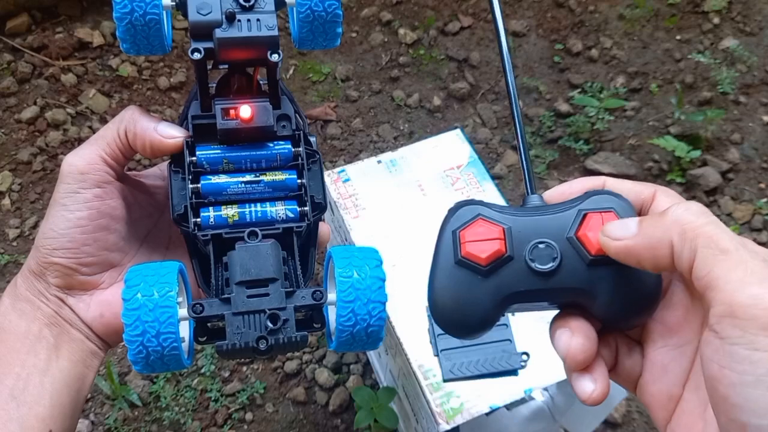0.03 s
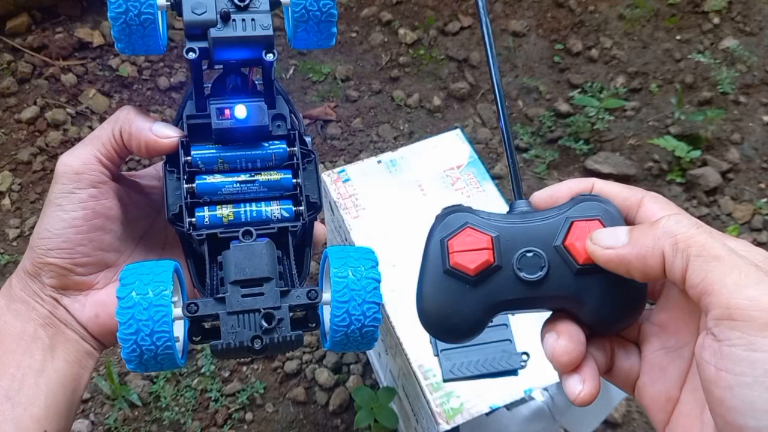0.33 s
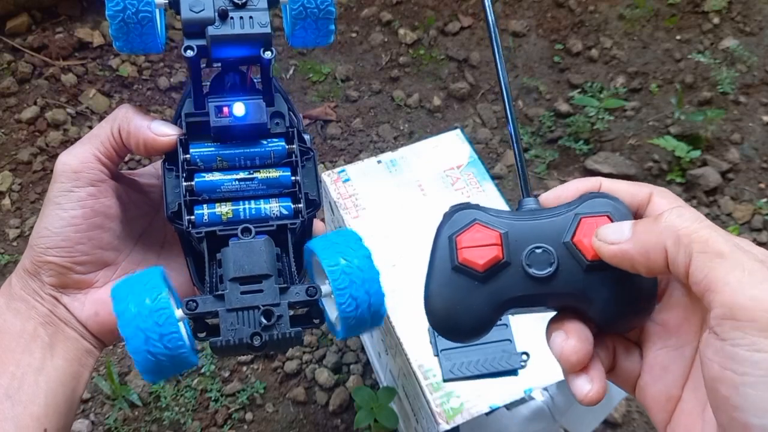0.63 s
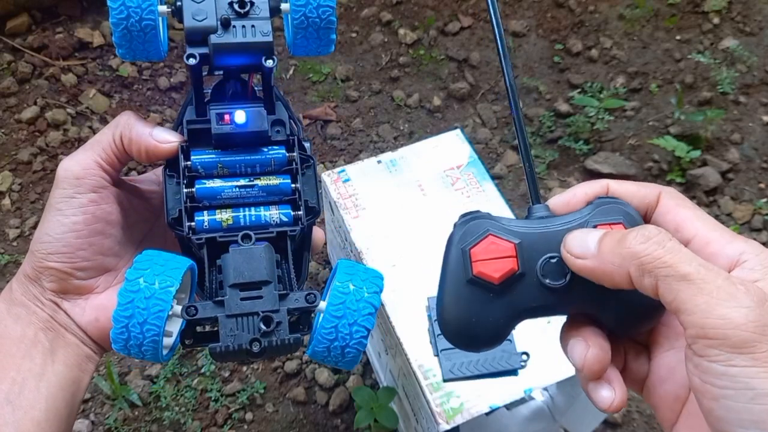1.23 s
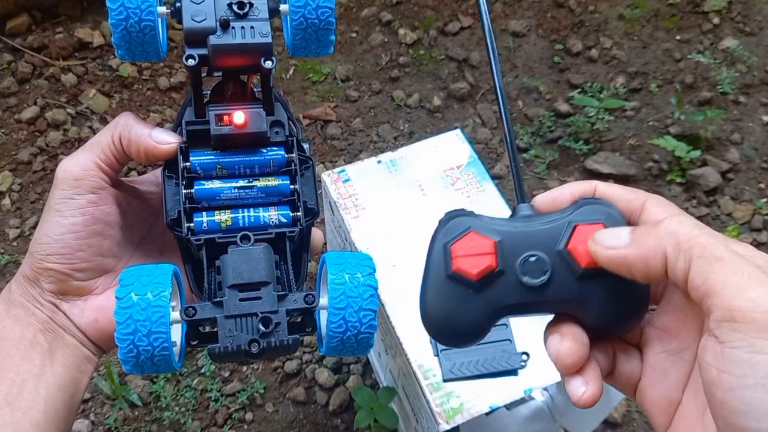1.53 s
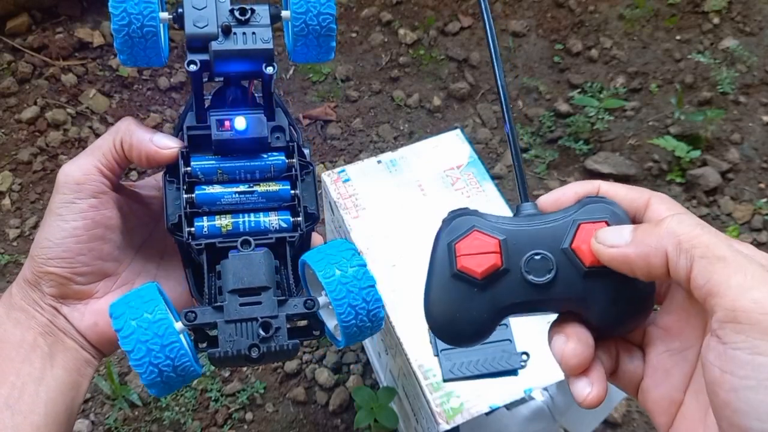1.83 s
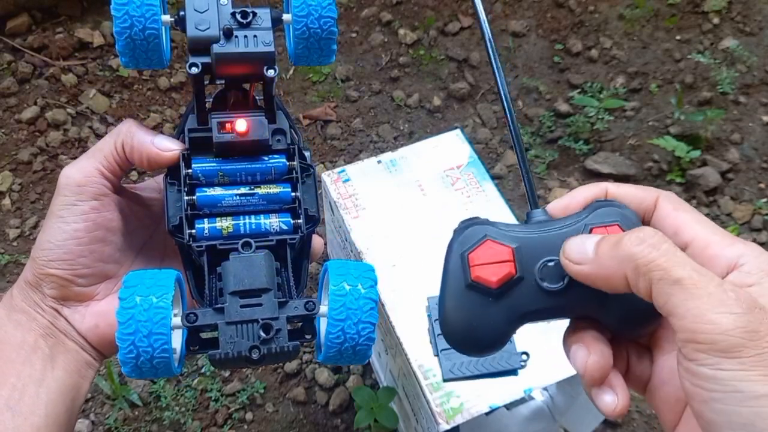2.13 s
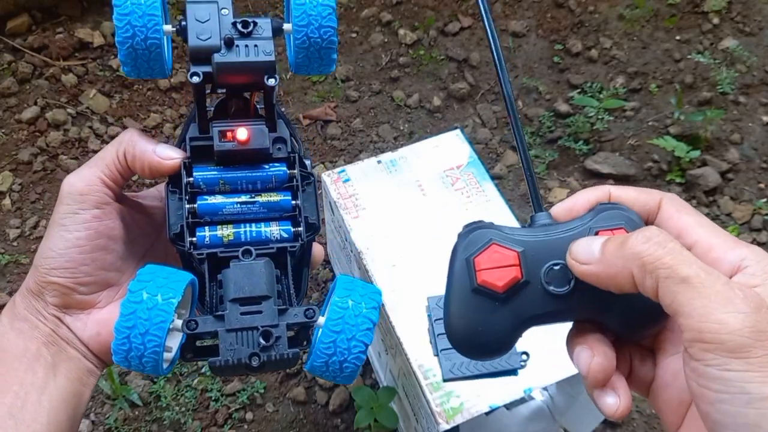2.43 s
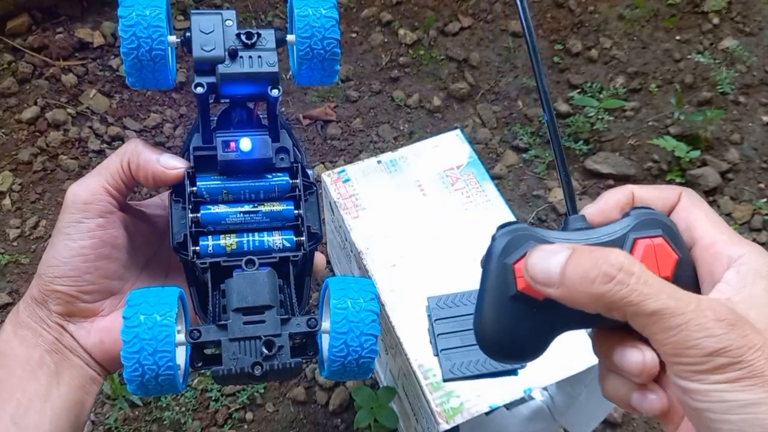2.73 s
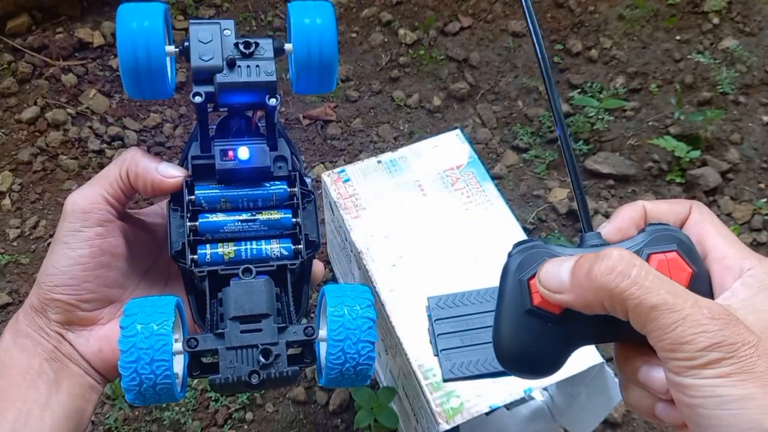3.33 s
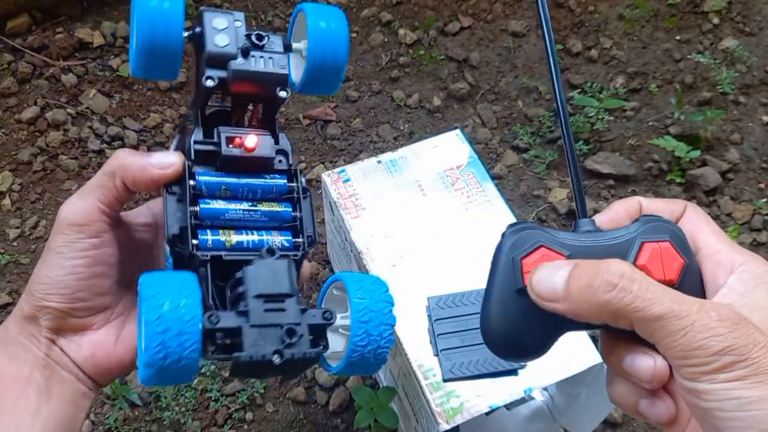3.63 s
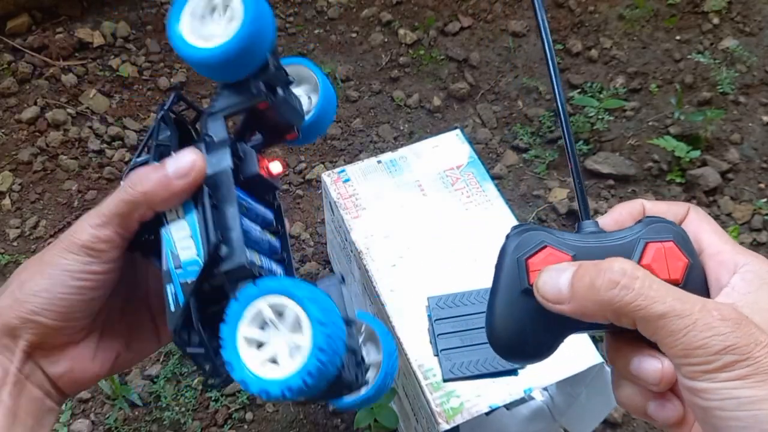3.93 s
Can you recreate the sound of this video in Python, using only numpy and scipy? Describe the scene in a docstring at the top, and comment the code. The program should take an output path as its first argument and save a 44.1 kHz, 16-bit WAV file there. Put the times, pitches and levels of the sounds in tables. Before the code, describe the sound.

A toy car's whirring motor is the main sound, heard close outdoors. First, from about 0.2 seconds, plastic remote buttons click repeatedly while the steering answers with small ticks and scrapes. A soft hollow bump comes at 2.7 seconds. From 2.9 the motor spins up with clattering gears, peaks near 3.4 and slows toward 4. A low engine-like drone and faint insect trill sit behind.

```python
"""A toy car is held upside down outdoors, close by. A soft low rush opens; then buttons snap in the
remote's plastic shell and the steering answers with linkage ticks and rack scrapes.
At 2.7 s the grip shifts and bumps the hollow remote. From 2.9 s the motor spins the free wheels:
gear teeth ring the gearbox and clatter in their play, brushes hiss, the chassis hums; then it runs down.
Throughout: a low drone like a distant engine, a thin insect trill, a short echo off nearby walls."""
import sys
import numpy as np
from scipy import signal
from scipy.fft import rfft, irfft, next_fast_len
from scipy.io import wavfile
from scipy.ndimage import map_coordinates

SR = 44100
rng = np.random.default_rng(int(sys.argv[2]) if len(sys.argv) > 2 else 0)


def generate_wav(sig):
    """Save sig (samples, or channels by samples) to the path in sys.argv[1] as 16-bit PCM at SR."""
    pcm = np.round(np.clip(np.atleast_2d(sig).T, -1, 1) * 32767).astype(np.int16)
    wavfile.write(sys.argv[1], SR, pcm)


N = 176400

# Drive effort (time [s], gear level [dB], brush level [dB])
DRIVE_EFFORT = [(2.87, -84, -88), (2.885, -64, -70), (2.955, -54.5, -63), (2.985, -43.5, -78),
                (3.05, -39.5, -59), (3.17, -42, -56), (3.3, -38, -53.5), (3.48, -41.5, -53.5),
                (3.6, -44, -55.5), (3.7, -52, -58), (3.82, -53.5, -61.5), (3.92, -50, -72), (4.0, -58, -67)]
# Motor speed (time [s], share of full speed [1])
MOTOR_SPEED = [(2.87, 0.013), (2.96, 0.33), (3.05, 0.74), (3.2, 0.92), (3.45, 0.99), (3.7, 0.79),
               (4.0, 0.49)]
# Gears jumping in their play (time [s], strength [dB])
GEAR_JUMPS = [(3.052, 2), (3.081, 6.5), (3.113, 7), (3.131, 7), (3.173, 10), (3.193, 8.5), (3.229, 4.5),
              (3.29, 6.5), (3.335, -1), (3.431, 8.5), (3.473, 13), (3.486, 6.5), (3.518, 5.5),
              (3.576, 10.5), (3.617, 10), (3.634, 6), (3.659, 10.5), (3.679, 12.5), (3.705, 14),
              (3.756, 17), (3.788, 16.5), (3.814, 12.5), (3.842, 10.5), (3.914, 3)]
# Brush hiss (frequency [Hz], gain [dB])
BRUSH_SPECTRUM = [(3000, -16), (7000, -6), (8700, -5.5), (9700, -5), (10800, -5.5), (12050, 0.5),
                  (13100, -16), (15000, -1.5), (16000, -26)]
# Brush ring at high speed (frequency [Hz], gain [dB])
BRUSH_RING_SPECTRUM = [(9000, -40), (11300, -12), (12050, 0), (12600, -14), (14500, -35)]
# Drive balance (frequency [Hz], left over right [dB])
DRIVE_PAN = [(200, -2.5), (700, 4), (1700, 4), (2700, 0.5), (3700, 4), (5700, 1.5), (7500, 1), (9300, 7),
             (15000, 5)]

def drive():
    """The motor turns the gears while its brushes hiss; each gear jump swells both."""
    t = np.arange(N) / SR
    gears_db, brush_db = curves(DRIVE_EFFORT)
    speed, = curves(MOTOR_SPEED)
    jumps_db = sum(db * bell(t, s, sigma_s=0.0038) for s, db in GEAR_JUMPS)
    gears = gearbox(speed)
    clatter_db = 0.79 * jumps_db + 4.2 * np.tanh(wobble(130))
    gears *= amp(gears_db - 0.5 + clatter_db)
    hiss = amp(brush_db - 1.5 + 0.34 * clatter_db) * noise(BRUSH_SPECTRUM, side_db=-1.5)
    brush_ring = amp(-56) * speed ** 5.5 * noise(BRUSH_RING_SPECTRUM, side_db=-4)
    return filtered(gears + hiss + brush_ring, lambda hz: pan(along(DRIVE_PAN, hz)))

# Gearbox response (frequency [Hz], gain [dB])
GEARBOX_RESPONSE = [(100, -20), (200, -5.5), (330, -7.5), (620, -20), (850, -8.5), (1150, -2), (1400, -1),
                    (1650, 2.5), (1880, -1), (2080, 7.5), (2400, 0), (2800, -3.5), (3100, -0.5), (3600, -2),
                    (4700, -5), (5500, 0), (5950, -1.5), (6350, -14.5), (7700, -14), (8500, -18.5),
                    (16000, -25)]
# Housing resonances (frequency [Hz], bandwidth [Hz], gain [dB])
HOUSING_MODES = [(1692, 60, 4.5), (2090, 28.2, -11), (3050, 125, 0.5), (3790, 49, -7), (5570, 180, -9),
                 (5800, 130, -12)]
# Gearbox stereo width (frequency [Hz], side over mid [dB])
GEARBOX_WIDTH = [(100, -26), (380, -10), (700, 0), (1300, -2), (2400, 4.5), (4400, -1.5), (15000, 3)]

def gearbox(speed, full_speed_tooth_hz=2098, scatter_db=4):
    """Gear teeth strike unevenly and ring the gearbox and its housing."""
    def housing(hz):
        return sum(amp(db) * 1j * hz * width / (centre ** 2 - hz ** 2 + 1j * hz * width)
                   for centre, width, db in HOUSING_MODES)

    def mid_side_gains(hz):
        angle = np.arctan(amp(along(GEARBOX_WIDTH, hz)))
        return np.array([np.cos(angle), np.sin(angle)])

    teeth_passed = np.cumsum(full_speed_tooth_hz * speed * (1 + 0.012 * wobble(60))) / SR
    strikes = np.diff(np.floor(teeth_passed), prepend=0) * np.sqrt(SR / full_speed_tooth_hz)
    polarity = rng.choice([-1, 1], (2, N))
    strength = amp(scatter_db * np.clip(rng.standard_normal((2, N)), -2, 1))
    mesh_tone = amp(-14.5) * strikes
    tooth_noise = amp(0.5) * rng.standard_normal((2, N))
    force = strikes * polarity * strength + mesh_tone + tooth_noise
    body = unit(coloured(force, lambda hz: along(GEARBOX_RESPONSE, hz)))
    body += amp(-8.5) * unit(filtered(force, housing))
    mid, side = filtered(wandering_contact(body, depth_db=3), mid_side_gains)
    stereo = np.array([mid + side, mid - side])
    return stereo / np.std(stereo[:, speed > 0.5])

def wandering_contact(x, depth_db):
    """The contact point wanders: each moment rings other parts of the housing with the same energy."""
    frames = signal.stft(x, nperseg=512)[2]
    patch = np.outer(np.hanning(7), np.hanning(10))
    field = signal.fftconvolve(rng.standard_normal(frames.shape[1:]), patch, mode="same")
    frames *= amp(depth_db * np.clip(unit(field), -2, 2))
    frames /= np.linalg.norm(frames, axis=(0, 1))
    return signal.istft(frames, nperseg=512)[1][:, :N]

def clatter_rings(low_hz=1500, high_hz=6000, t60_s=0.024, lead_s=0.0019):
    """Each gear jump rings eight housing modes, different every time."""
    out, t = np.zeros((2, N)), np.arange(SR // 10) / SR
    gears_db, _ = curves(DRIVE_EFFORT)
    envelope = amp(-60 * t / t60_s) * attack(t, 0.0007)
    for s, db in GEAR_JUMPS:
        hz = low_hz * (high_hz / low_hz) ** rng.random((8, 1))
        ring = unit(rng.standard_normal((2, len(hz))) @ np.sin(2 * np.pi * hz * t))
        level_db = gears_db[round(s * SR)] + db - 2
        add(out, s - lead_s, pan(2.7) * amp(level_db) * envelope * ring)
    return out

# Chassis vibration (frequency [Hz], gain [dB])
HUM_SPECTRUM = [(90, -11), (150, 5), (200, -2.5), (320, -1.5), (480, -8), (650, -20), (1200, -40)]
# Hum envelope (time [s], level [dB])
HUM_ENVELOPE = [(2.87, -88), (2.92, -57), (3.2, -51), (3.42, -51), (3.6, -69.5), (3.8, -73), (4, -78)]

def chassis_hum():
    """The loaded motor shakes the chassis."""
    level_db, = curves(HUM_ENVELOPE)
    return pan(3.9) * amp(level_db) * noise(HUM_SPECTRUM, side_db=-15)

# Button and tick band centres (frequency [Hz])
CLICK_BANDS_HZ = [1400, 2800, 5600, 11300]
# Presses and releases (time [s], left over right [dB], 4 x band gain [dB])
BUTTON_SNAPS = [(0.2433, 1.4, -37, -36, -38.5, -35), (.596, 2.1, -51.5, -49, -59.5, -60),
                (.868, .5, -38, -32.5, -45, -40.5), (1.2805, 1.3, -38, -40.5, -59.5, -62),
                (1.545, 3.1, -41.5, -33.5, -41.5, -34.5), (1.8477, 2.2, -40.5, -43, -51, -55.5),
                (2.1081, .5, -38, -32, -40.5, -41), (2.511, 2.03, -45, -53, -56, -59.5),
                (2.871, 3.3, -43, -43, -45.5, -45.5)]
# Remote shell response (frequency [Hz], gain [dB])
SHELL_RESPONSE = [(200, -15), (700, -22.5), (1000, -14), (1250, -0.5), (1420, -4.5), (1620, 11.5),
                  (1900, 3), (2500, 0), (3300, -2), (4300, -8), (5300, -2.5), (6300, -2.5), (7500, -4.5),
                  (9400, -3.5), (11500, -11.5), (13000, -15), (16000, -15)]
# Shell after-ring (frequency [Hz], gain [dB])
SHELL_RING = [(500, -24), (1350, -12.5), (1580, 7), (1850, -14), (2300, -6.5), (3050, -1), (3500, -4),
              (4100, -7), (12000, -31)]

def buttons():
    """Each snap cracks through the remote's shell, which rings on faintly."""
    out = np.zeros((2, N))
    for s, pan_db, *band_db in BUTTON_SNAPS:
        bands = list(zip(CLICK_BANDS_HZ, band_db))
        tail = burst(t60_s=0.14, rise_s=0.036, side_db=-0.5)
        ring = amp(-3) * coloured(tail, lambda hz: along(SHELL_RING, hz))
        crack = amp(-7.5) * burst(t60_s=0.0027, rise_s=0.0001, side_db=-10)
        body = burst(t60_s=0.023, rise_s=0.0001, side_db=-2.5)
        snap = coloured(crack + body, lambda hz: along(SHELL_RESPONSE, hz))
        add(out, s, pan(pan_db) * amp(33) * coloured(snap + ring, lambda hz: along(bands, hz)))
    return out

# Steering ticks (time [s], left over right [dB], 4 x band gain [dB])
LINKAGE_TICKS = [(.406, 6.5, -68, -66, -62, -54), (.942, 7, -71, -68, -55, -40.5),
                 (1.037, 4.5, -62, -50.5, -54.5, -48), (1.333, 6.2, -47, -47, -51.5, -50.5),
                 (1.426, 9, -62, -62, -73, -53), (1.635, 5.5, -66, -58, -59, -60),
                 (2.011, 5.3, -62, -66, -68, -55), (2.277, 5.5, -60, -50.5, -50.5, -48),
                 (2.572, 5.2, -54.5, -47, -53, -48.5), (2.745, 3.7, -45, -53, -62, -67),
                 (2.923, 3.5, -49, -51, -56, -58), (2.935, 2.6, -40.5, -47, -62, -66)]
# Linkage response (frequency [Hz], gain [dB])
LINKAGE_RESPONSE = [(200, -30), (900, -15), (1700, 0), (2100, -1), (2450, 5.5), (3200, -11), (4200, 0.5),
                    (7000, -1.5), (11000, -8.5), (16000, -10)]

def steering_linkage():
    """The linkage takes up play and ticks against its stops."""
    out = np.zeros((2, N))
    for s, pan_db, *band_db in LINKAGE_TICKS:
        bands = list(zip(CLICK_BANDS_HZ, band_db))
        crack = amp(-2) * burst(t60_s=0.0027, rise_s=0.0001, side_db=-2.5)
        body = amp(-3.5) * burst(t60_s=0.021, rise_s=0.00087, side_db=-0.5)
        tick = coloured(crack + body, lambda hz: along(bands, hz) + along(LINKAGE_RESPONSE, hz))
        add(out, s, pan(pan_db) * amp(32.5) * tick)
    return out

# Rack strokes (time [s], length [s], level [dB])
RACK_STROKES = [(0.403, 0.049, -54), (.70, 0.034, -58), (0.776, .018, -66.5), (1.638, 0.048, -57),
                (1.924, 0.038, -58), (2.255, 0.033, -66)]
# Rack scrape (frequency [Hz], gain [dB])
RACK_SPECTRUM = [(300, -37), (1200, -4), (1800, 1), (4000, 0.5), (6500, -3.5), (9000, -7), (16000, -14)]

def steering_rack():
    """The rack slides in small jerks."""
    envelope, t = np.zeros(N), np.arange(N) / SR
    for s, length_s, db in RACK_STROKES:
        travel = np.clip((t - s) / length_s, 0, 1)
        envelope += amp(db) * np.sqrt(abs(np.sin(np.pi * travel)))
    scrape = unit(noise(RACK_SPECTRUM, side_db=2) * amp(4.3 * wobble(350)))
    return pan(4.7) * envelope * scrape

# Knocks on the remote (time [s], level [dB])
GRIP_KNOCKS = [(2.679, -32.5), (2.7003, -29.5)]
# Hollow remote modes (frequency [Hz], gain [dB], t60 [s])
REMOTE_MODES = [(276.5, 0, 0.08), (241, -24.5, .07), (1190, -4, 0.0076)]
# Grip scuff (frequency [Hz], gain [dB])
SCUFF_SPECTRUM = [(300, -11), (550, -10.5), (950, -1), (1350, -8.5), (1900, -17), (2350, -11), (3400, -19),
                  (4150, -9.5), (4600, -8), (5300, -37), (9000, -45)]

def grip_bump():
    """The grip shifts: a soft double knock on the hollow remote, with a dull scuff."""
    out, t = np.zeros((2, N)), np.arange(SR // 2) / SR
    ring = sum(amp(db - 60 * t / t60_s) * np.sin(2 * np.pi * hz * t) for hz, db, t60_s in REMOTE_MODES)
    ring *= attack(t, 0.001)
    for s, db in GRIP_KNOCKS:
        rub = burst(t60_s=0.12, rise_s=0.00025, side_db=1)
        scuff = amp(23.5) * coloured(rub, lambda hz: along(SCUFF_SPECTRUM, hz))
        add(out, s, amp(db) * pan(5.3) * (ring + scuff))
    return out

# Echo decay (frequency [Hz], t60 [s])
WALL_DECAY = [(200, 0.42), (2000, 0.3), (6000, 0.18), (14000, 0.24)]

def wall_echo(x):
    """Nearby walls return a diffuse echo; each frequency dies at its own rate."""
    hz, t, frames = signal.stft(rng.standard_normal((2, SR // 2)), SR, nperseg=256)
    envelope = amp(-60 * t / along(WALL_DECAY, hz)[:, None]) * attack(t, 0.0099)
    tail = signal.istft(frames * envelope, SR, nperseg=256)[1]
    return signal.fftconvolve(x, tail / np.linalg.norm(tail[0]), axes=1)[:, :N]

# Drone pitch (time [s], frequency [Hz])
DRONE_PITCH = [(0, 103.3), (1.3, 102.2), (2.0, 99), (2.6, 97), (3.0, 93), (3.4, 92.7), (3.52, 85.1),
               (3.75, 96.9), (4, 95.6)]
# Drone envelope (time [s], level [dB])
DRONE_ENVELOPE = [(0, -46), (.28, -41), (.5, -50), (.85, -59), (.95, -46), (1.02, -55), (1.28, -44.5),
                  (1.45, -44.5), (1.6, -43.5), (1.85, -46), (1.98, -39), (2.27, -53.5), (2.38, -34),
                  (2.46, -45), (2.78, -48.5), (2.92, -41), (3.24, -43.5), (3.36, -33.5), (3.6, -45.5),
                  (4, -58.5)]

def far_drone(waver_db=3):
    """A wavering low tone with a faint octave, like a distant engine."""
    hz, = curves(DRONE_PITCH)
    level_db, = curves(DRONE_ENVELOPE)
    phase = 2 * np.pi * np.cumsum(hz) / SR + 0.5 * wobble(18)
    tone = np.sin(phase) + amp(-25) * np.sin(2 * phase)
    return pan(1.85) * amp(level_db + 0.5 + waver_db * wobble(35)) * tone

# Outdoor rumble (frequency [Hz], gain [dB])
RUMBLE_SPECTRUM = [(20, -32), (35, -35), (48, -10), (62, -1.5), (90, 3), (120, 1), (165, -9.5),
                   (215, -10.5), (300, -16.5), (450, -30.5), (700, -44), (1500, -51)]
# Air hiss (frequency [Hz], gain [dB])
AIR_SPECTRUM = [(250, 10), (600, 2.5), (1200, -3), (1650, 4), (2400, -3.5), (4000, -11), (7500, -15.5),
                (11000, -14.5), (16000, -4)]

def outdoor_air():
    """Steady low rumble and faint hiss."""
    rumble = pan(1.85) * amp(-50) * noise(RUMBLE_SPECTRUM, side_db=-11)
    return rumble + amp(-67.5) * noise(AIR_SPECTRUM, side_db=2)

# Low rush (frequency [Hz], gain [dB])
RUSH_SPECTRUM = [(200, -15), (300, 4.5), (400, -2), (500, -8.5), (620, -22.5), (1200, -38)]

def low_rush():
    """A soft rush that peaks just before the first press."""
    envelope = bell(np.arange(N) / SR, centre_s=0.19, sigma_s=0.079)
    return amp(-55.5) * envelope * noise(RUSH_SPECTRUM, side_db=-6.5)

# Trills (start [s], end [s], level [dB])
INSECT_TRILLS = [(-.1, 0.336, -68.5), (.53, 1.143, -68.5), (1.37, 1.954, -69), (2.166, 2.726, -67.5)]
# Trill band (frequency [Hz], gain [dB])
TRILL_SPECTRUM = [(9100, -51), (9420, -11), (9520, -10), (9620, -13.5), (9780, -17), (10200, -52)]
# Upward slur (time [s], frequency [Hz], level [dB])
INSECT_SLUR = [(.12, 9600, -100), (.145, 9850, -70), (.17, 10100, -69), (.2, 10020, -71), (.23, 9800, -100)]

def insect(fade_s=0.08, jitter_hz=70):
    """Thin trills with pauses between them, and one upward slur."""
    t = np.arange(N) / SR
    envelope = sum(amp(db) * np.clip(np.minimum(t - start, end - t) / fade_s, 0, 1)
                   for start, end, db in INSECT_TRILLS)
    slur_hz, slur_db = curves(INSECT_SLUR)
    slur = amp(slur_db) * np.sin(2 * np.pi * np.cumsum(slur_hz + jitter_hz * wobble(350)) / SR)
    return envelope * noise(TRILL_SPECTRUM, side_db=2.5) + slur

def amp(db):
    """Decibels to gain."""
    return 10 ** (np.asarray(db) / 20)

def unit(x):
    """Scale to rms 1."""
    return x / np.sqrt(np.mean(x ** 2) + 1e-20)

def attack(t, rise_s):
    """Exponential rise from 0 to 1."""
    return 1 - np.exp(-t / rise_s)

def bell(t, centre_s, sigma_s):
    """Gaussian pulse of height 1."""
    return np.exp(-0.5 * ((t - centre_s) / sigma_s) ** 2)

def along(points, hz):
    """Interpolate (frequency [Hz], value) points on a log axis."""
    knots_hz, values = np.transpose(points)
    return np.interp(np.log(hz + 1), np.log(knots_hz + 1), values)

def curves(rows):
    """One value per sample for each column after the time."""
    times_s, *columns = np.transpose(rows)
    return [np.interp(np.arange(N) / SR, times_s, column) for column in columns]

def wobble(knots_per_s):
    """Smooth random curve."""
    return map_coordinates(rng.standard_normal(4096), [np.arange(N) * knots_per_s / SR], mode="wrap")

def pan(db):
    """Left and right gains for a level difference."""
    return amp(np.array([np.atleast_1d(db), -np.atleast_1d(db)]) / 2)

def filtered(x, response):
    """Multiply the spectrum of x by response(hz)."""
    size = next_fast_len(N + SR // 2)
    return irfft(rfft(x, size) * response(np.fft.rfftfreq(size, 1 / SR)), size)[..., :N]

def coloured(x, gain_db, size=2048):
    """Minimum-phase filter with gain gain_db(hz)."""
    cepstrum = irfft(np.log(amp(gain_db(np.fft.rfftfreq(size, 1 / SR)))))
    cepstrum[1:size // 2] *= 2
    cepstrum[size // 2 + 1:] = 0
    impulse = irfft(np.exp(rfft(cepstrum)))
    return signal.fftconvolve(x, impulse[None], axes=1)[:, :x.shape[1]]

def white(side_db, size):
    """White stereo noise with the given side level."""
    mid, side = rng.standard_normal((2, size))
    return unit(np.array([mid + amp(side_db) * side, mid - amp(side_db) * side]))

def noise(spectrum, side_db):
    """Coloured stereo noise of rms 1."""
    return unit(filtered(white(side_db, N), lambda hz: amp(along(spectrum, hz))))

def burst(t60_s, rise_s, side_db):
    """Dying noise burst of energy 1: many close modes of a plastic part."""
    t = np.arange(SR // 2) / SR
    return unit(white(side_db, len(t)) * amp(-60 * t / t60_s) * attack(t, rise_s)) / np.sqrt(len(t))

def add(out, start_s, x):
    """Mix x into out at start_s."""
    part = out[:, max(round(start_s * SR), 0):][:, :x.shape[-1]]
    part += x[..., :part.shape[1]]

def scene():
    """Remote and car, their echo and the surroundings."""
    remote = buttons() + grip_bump()
    steering = steering_linkage() + steering_rack()
    motor = drive() + clatter_rings() + chassis_hum()
    echo = wall_echo(amp(-12.5) * remote + amp(-9) * steering + amp(-8) * motor)
    return remote + steering + motor + echo + far_drone() + outdoor_air() + insect() + low_rush()

def record(dry, cutoff_hz=16000):
    """Steep low-pass."""
    return filtered(dry, lambda hz: 1 / (1 + (hz / cutoff_hz) ** 120))

dry = scene()
out = record(dry)
generate_wav(out)
```